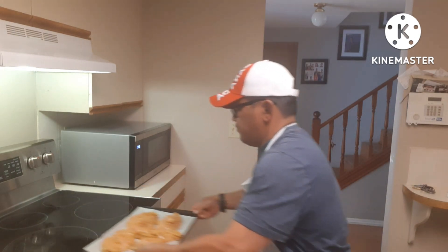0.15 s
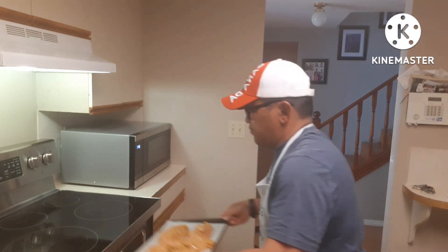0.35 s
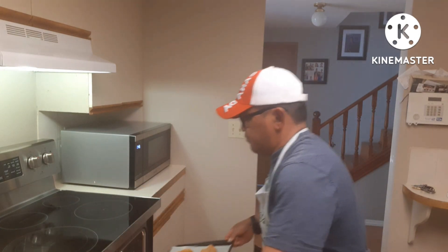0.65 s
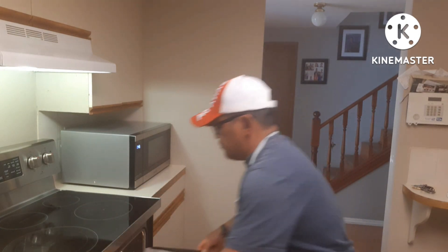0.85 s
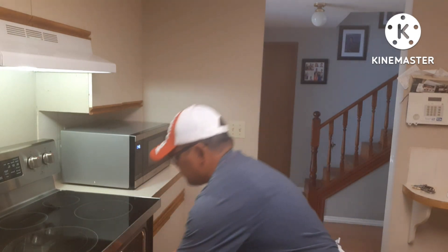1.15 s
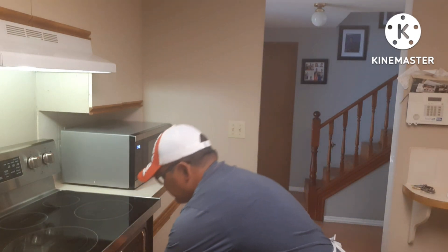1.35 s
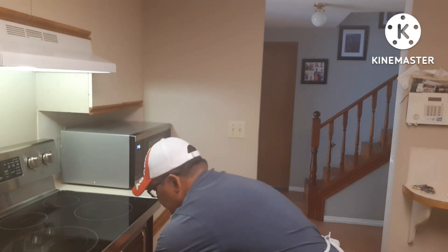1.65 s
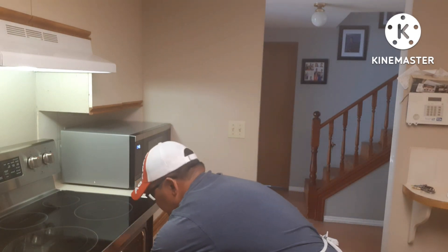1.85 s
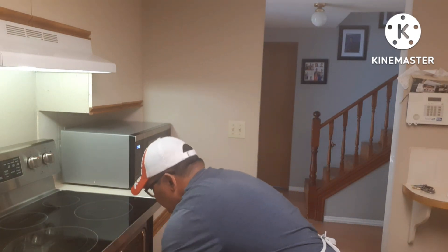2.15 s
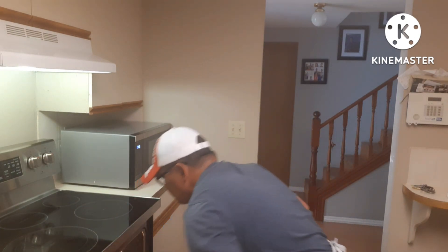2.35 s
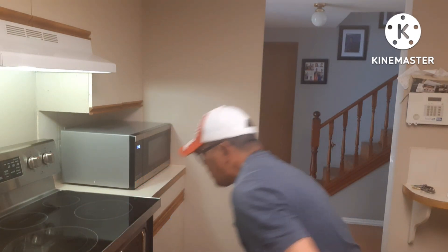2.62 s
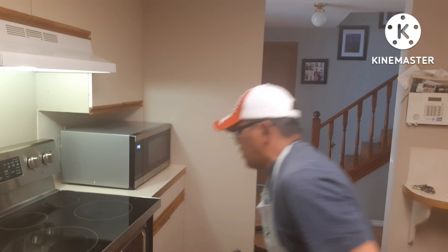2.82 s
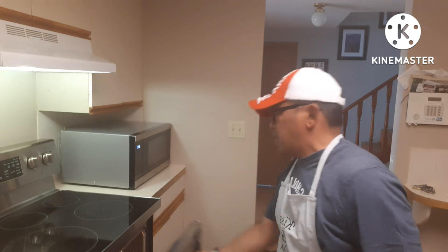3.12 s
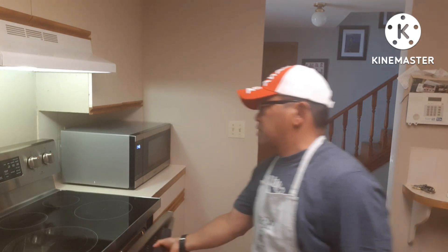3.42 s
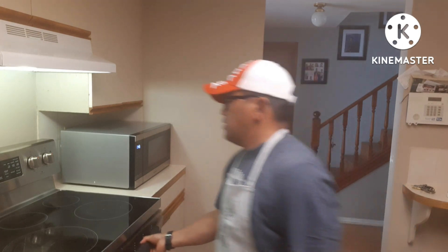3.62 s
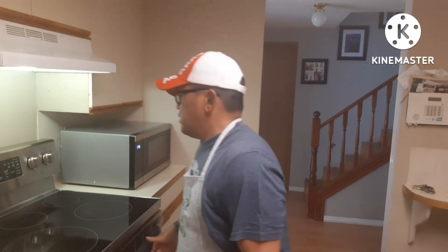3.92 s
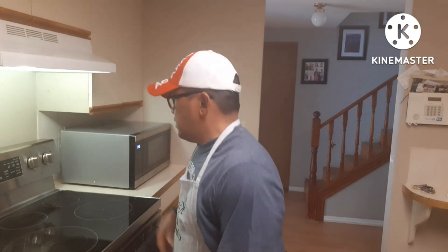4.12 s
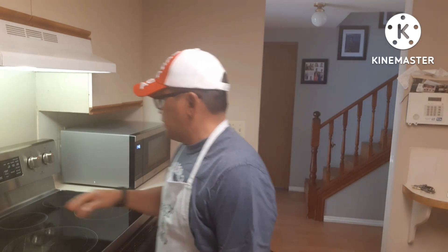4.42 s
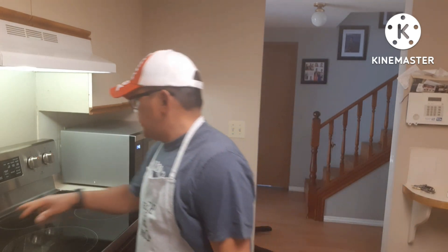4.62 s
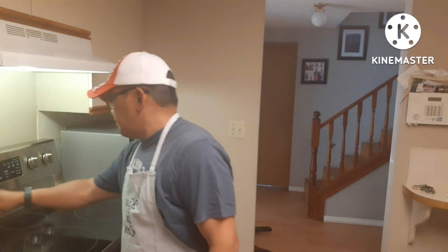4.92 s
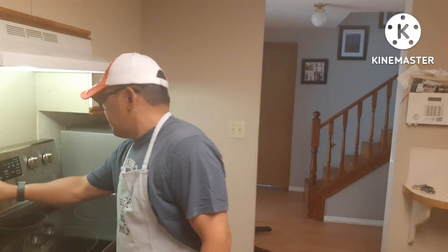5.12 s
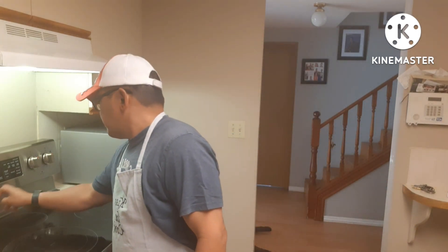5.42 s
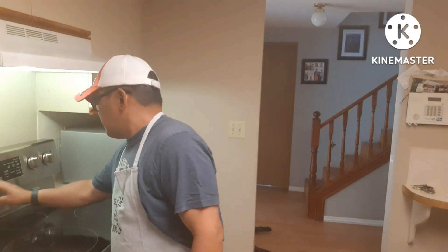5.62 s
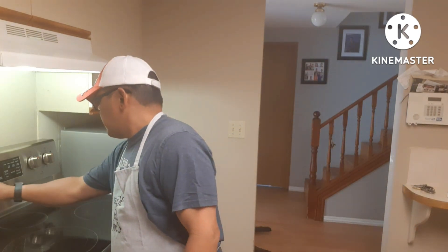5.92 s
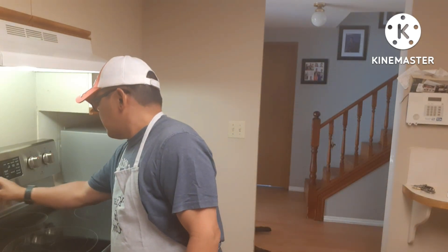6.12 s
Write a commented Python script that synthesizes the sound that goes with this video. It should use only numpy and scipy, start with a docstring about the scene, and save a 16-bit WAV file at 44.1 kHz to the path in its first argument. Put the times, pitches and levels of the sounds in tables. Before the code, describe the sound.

A small, hard kitchen is heard closely in stereo, with short bright room ring and very faint hiss and low rumble. From 0 to 0.3 seconds a thin metal sheet scrapes with growing force off a stove top, with quick clattering knocks. A hinge rubs from 0.5, and the oven door comes off its seal with a soft low boom near 0.75. A tiny wire tick comes at 1.1. The sheet lands on the rack with a rattling clank at 1.6 and a louder one at 2.0. The rack slides in quietly from 2.7 to 3.5, its pitch sinking. The door bumps at 3.25, springs creak and snap through 3.9, and it thuds shut at 4.06, with small after-rattles until 4.45. A low steady electrical hum sets in around 3.8. One hollow panel knock sounds at 4.95; fingers brush barely audibly near 5.8 before the end at about 6.3.

```python
"""Baking sheet into the oven

A metal sheet scrapes off a stove top, the oven door is pulled open and the sheet clanks onto the wire rack.
The rack slides in, the door creaks up on sprung hinges and shuts, and a hand knocks the control panel.
Blows and rubs are shaped noise through each part's resonances; the small hard kitchen rings after every blow.
Sine tones make the booms and a low mains hum that sets in; filtered noise makes rumble and hiss."""
import sys
import numpy as np
from scipy import signal
from scipy.fft import rfft, irfft, next_fast_len
from scipy.io import wavfile
from scipy.ndimage import map_coordinates

SR = 44100
rng = np.random.default_rng(int(sys.argv[2]) if len(sys.argv) > 2 else 0)


def store_pcm(level_fs):
    """Save levels as 16-bit WAV."""
    pcm = np.round(np.clip(level_fs, -1, 1) * 32767).astype(np.int16)
    wavfile.write(sys.argv[1], SR, np.atleast_2d(pcm).T)


N = 276138  # samples

# Contacts, before tone and trim: start_s, thud_db, clank_db, hardness_db_per_octave (treble), rattle_s
SHEET_BLOWS = [(0.095, -50.5, -37, -5, 0.06), (0.122, -50.5, -32.5, -6.5, 0.07),
               (0.232, -51, -34.5, 0.5, 0.026), (0.251, -46, -35, -2, 0.034), (1.613, -35, -40, 2, 0.17),
               (2.007, -45, -38.5, 0.5, 0.015), (2.011, -34, -30.5, -2.25, 0.084),
               (2.739, -57, -53.5, 2.5, 0.027)]
# Door bumps against the frame: start_s, thud_db, clank_db, hardness_db_per_octave, rattle_s
DOOR_BLOWS = [(3.254, -39, -41.5, -1.2, 0.018), (4.061, -35, -39, -1.7, 0.04),
              (4.234, -57.5, -63, 2, 0.067), (4.407, -50, -48.5, 0.24, 0.04)]
# Snaps of the hinge springs, and the latch catching at 4.101 s: start_s, thud_db, clank_db,
# hardness_db_per_octave, rattle_s
HINGE_SNAPS = [(0.765, -53, -58.5, 1.93, 0.0054), (3.214, -59.5, -48.5, 2.13, 0.017),
               (3.532, -49, -43.5, 0.2, 0.025), (3.687, -39.5, -42, 2.5, 0.025),
               (3.828, -48.5, -52.5, -1.5, 0.025), (4.101, -50, -49, -0.1, 0.029)]
# A knock on the panel: start_s, thud_db, clank_db, hardness_db_per_octave, rattle_s
PANEL_KNOCKS = [(4.945, -38.5, -48.5, 0.0059, 0.079)]
# A light tap on a rack wire: start_s, thud_db, clank_db, hardness_db_per_octave, rattle_s
WIRE_TAPS = [(1.104, -73, -61, 0, 0.015)]

# How each struck part shares out a blow: bass_db, body_db, middle_db, treble_db, top_db
SHEET_TONE = [-13, -1, 1, -2, -10.5]
# Door: bass_db, body_db, middle_db, treble_db, top_db
DOOR_TONE = [-6.5, 1.5, 0.5, -2.5, -15.5]
# Hinge: bass_db, body_db, middle_db, treble_db, top_db
HINGE_TONE = [-8, -2.5, -1, 5.5, -3]
# Panel: bass_db, body_db, middle_db, treble_db, top_db
PANEL_TONE = [-26.5, 1, 1.5, -1.5, -7.5]
# Wire: bass_db, body_db, middle_db, treble_db, top_db
WIRE_TONE = [-7.5, -1, 2.5, 17, 15.5]
# The five bands of those tones: low_hz, high_hz
TONE_BANDS = [(45, 170), (170, 600), (600, 2500), (2500, 8000), (8000, 16000)]

# Resonances over the broad response: centre_hz, width_hz, level_db
SHEET_MODES = [(197, 30, 4), (285, 60, 7), (357, 60, 10), (523, 28, 8), (724, 21, 8), (988, 45, 6),
               (1090, 42, 4), (1165, 20, 6.5), (1515, 70, 7), (2050, 70, 10), (2330, 240, 5),
               (2920, 90, 0.5), (3390, 120, 6.5), (4890, 160, 4)]
# Oven door: centre_hz, width_hz, level_db
DOOR_MODES = [(61.7, 27, 12), (92, 30, 11), (173, 30, 6), (287, 13, 15), (352.5, 23, 16), (931, 50, 2.7),
              (1300, 28, 1.2), (2010, 80, 4.3), (4210, 190, 3)]
# Sprung hinge: centre_hz, width_hz, level_db
HINGE_MODES = [(61.5, 30, 12.5), (95, 49, 10), (383, 83, -0.5), (1150, 80, 1.5), (1550, 72, 6.5),
               (2058, 100, 6.5), (2985, 190, -3), (4940, 250, 1), (5500, 420, 3.5), (6150, 250, 0.5),
               (7380, 970, 3)]
# Hollow control panel: centre_hz, width_hz, level_db
PANEL_MODES = [(272, 55, 22), (332, 90, 21.5), (398, 38, 21.5), (536, 92, 16), (735, 79, 16),
               (1475, 73, 17.5), (2150, 180, 9.5), (3670, 690, 11), (4790, 80, 9), (5510, 71, -5)]
# Rack on its rails: centre_hz, width_hz, level_db
RACK_MODES = [(140, 30, 19), (245, 50, 18), (930, 120, 18), (1120, 50, 13), (1580, 110, 17), (2040, 80, 16),
              (2880, 130, 15), (3710, 110, 8), (4100, 130, 9), (5900, 500, 6)]
# Thin rack wire: centre_hz, width_hz, level_db
WIRE_MODES = [(1210, 98, 13), (3040, 520, 8.5), (3620, 290, 11.5), (4530, 360, 15), (6550, 400, 10),
              (7400, 600, 7.5)]
# The oven's cavity, which colours the hiss: centre_hz, width_hz, level_db
CAVITY_MODES = [(1520, 80, 8.5), (2030, 81, 4.5)]

# Strokes, levels reached at the end and before trim: start_s, end_s, friction_db, shudder_db, swell_db_per_s
SHEET_DRAG = [(0, 0.23, -36.5, -42, 21.5), (0.255, 0.32, -34, -36, -17.5)]
# Rack on its rails: start_s, end_s, friction_db, shudder_db, swell_db_per_s
RACK_SLIDES = [(1.4, 1.6, -76, -86, 25), (1.76, 1.96, -62, -53.5, -40), (2.735, 2.99, -51.5, -49.5, -5),
               (3.06, 3.52, -63, -77.5, -1.5)]
# Hinge springs, and last the hand letting go of the door handle: start_s, end_s, friction_db, shudder_db,
# swell_db_per_s
HINGE_RUBS = [(0.52, 0.745, -53.5, -58.5, 78), (3.37, 3.51, -74, -51.5, -12), (3.835, 3.865, -43, -48, -7),
              (3.92, 4.03, -65.5, -54.5, -39.5), (4.13, 4.17, -58.5, -40, -64),
              (4.28, 4.38, -52.5, -53, 21.5), (4.43, 4.455, -57.5, -41, 2), (4.6, 4.88, -81, -79.5, -59)]
# Fingers on the panel: start_s, end_s, friction_db, shudder_db, swell_db_per_s
FINGER_RUBS = [(5.775, 5.81, -86.5, -95, -56)]
# Pitch of the rails' resonances falls with the travel, before drift: time_s, pitch_ratio
RACK_GLIDE = [(2.748, 1.04), (3.198, 0.95), (3.5, 0.9)]

# Friction colour of the sheet on the stove: frequency_hz, relative_db
SHEET_GRIT = [(290, -38.5), (500, -9.5), (800, -9.5), (1050, -8.5), (1490, -3), (2070, -7), (3000, -4.5),
              (7240, -11.5), (8720, -12.5), (11100, -15.5), (15500, -12.5)]
# Friction colour of the rails: frequency_hz, relative_db
RACK_GRIT = [(400, -15.5), (650, -1), (1300, -3.5), (3000, -7), (7000, -9), (15000, -13.5)]
# Friction colour of the hinges: frequency_hz, relative_db
HINGE_GRIT = [(400, -8), (700, -1.5), (1900, 2), (3000, 2.5), (5200, 1.5), (8000, -7), (15000, 0)]
# Friction colour of the fingers: frequency_hz, relative_db
FINGER_GRIT = [(500, -19.5), (1500, -12.5), (2400, -1), (3600, -14), (8000, -23), (15000, -9)]
# Shudder colour of the sheet: frequency_hz, relative_db
SHEET_SHUDDER = [(60, -18), (130, -6), (200, -2.5), (380, 4.5), (600, -1.5), (900, -25.5)]
# Shudder colour of the rack: frequency_hz, relative_db
RACK_SHUDDER = [(50, -7), (100, -15.5), (220, -6), (350, -2), (550, -7.5), (900, -19.5)]
# Shudder colour of the door, shared by the panel: frequency_hz, relative_db
DOOR_SHUDDER = [(25, -20), (45, -4.5), (100, -2.5), (200, -9), (400, -10), (900, -28)]

# The door booms as it is pulled off its seal: start_s, level_db
BOOMS = [(0.693, -38), (.752, -30), (0.817, -40.5), (0.985, -60)]
# Ringing tones of each boom: frequency_hz, relative_db, t60_s
BOOM_MODES = [(95, 6, 0.12), (71.3, -13.5, 0.23), (131.4, -6, .1), (195.7, -6, 0.13), (286, -28.5, 0.31)]

# Partials of the mains hum: frequency_hz, relative_db
MAINS_PARTIALS = [(120, 0), (240, -15), (360, -30)]
# Thin buzz, before waver: time_s, level_db
BUZZ_LEVEL = [(0, -90), (1.2, -81), (2.5, -81), (3.9, -69.5), (4.7, -78.5), (6.26, -79.5)]
HUM_FULL_S, HUM_RISE_S = 3.9, 0.2  # the swell ends at HUM_FULL_S
MAINS_DB, MAINS_SAG_DB_PER_S = -61.5, 1.0  # before waver
DRONE_DB, DRONE_GROWS_DB = -73, 3  # before waver; the motor works harder once the hum is on

# Colour of the room hiss: frequency_hz, relative_db
HISS_COLOUR = [(300, -19), (700, 5.5), (1000, 1), (1550, 0.5), (2200, 0.5), (3200, -1.5), (6200, -2.5),
               (9000, -5), (11500, -2.5), (14000, 4.5), (15500, 1.5)]
# Room hiss, a little stronger while the oven stands open: time_s, level_db
HISS_LEVEL = [(0, -80.5), (1.0, -70.5), (2.6, -72), (4.8, -74), (6.26, -78.5)]
# Colour of the appliance rumble: frequency_hz, relative_db
RUMBLE_COLOUR = [(20, -18), (45, -14.5), (80, 6.5), (115, -7), (200, -11), (330, -11), (500, -18),
                 (900, -25.5), (2000, -58)]
# Appliance rumble: time_s, level_db
RUMBLE_LEVEL = [(0, -76), (2.6, -72), (4.0, -69), (6.26, -70)]

# Kitchen decay, before the object's sustain: frequency_hz, t60_s
KITCHEN_DECAY = [(70, 0.33), (260, 0.42), (700, 0.4), (1900, 0.42), (5000, 0.41), (13000, .36)]
# Left-right likeness of diffuse sound: frequency_hz, correlation_ratio
LIKENESS = [(100, 0.94), (270, 0.83), (520, 0.68), (1000, 0.057), (10000, 0.018)]
DIRECT_GAIN = 0.11  # dry contact against the kitchen's answer
# Microphone port notch: frequency_hz, gain_db
PORT_NOTCH = [(7900, 0), (8500, -17), (9000, -11), (9700, -5), (11000, 0), (15000, -3)]
TOP_HZ = 15650  # nothing passes from here up


def amp(db):
    """Decibels to gain."""
    return 10 ** (np.asarray(db) / 20)


def rms(x):
    """Root mean square, never quite zero."""
    return np.sqrt(np.mean(x ** 2) + 1e-20)


def along(points, hz):
    """Read (frequency_hz, value) points on a log frequency axis."""
    point_hz, values = np.transpose(points)
    return np.interp(np.log(hz + 1), np.log(point_hz + 1), values)


def gains(rows):
    """One gain per sample from (time_s, level_db) points."""
    return amp(np.interp(np.arange(N) / SR, *np.transpose(rows)))


def wobble(rate):
    """A random curve of straight segments, rate knots a second."""
    knots = rng.standard_normal(int(N * rate / SR) + 4)
    return map_coordinates(knots, [np.arange(N) * rate / SR], order=1)


def coloured(x, gain):
    """Pass x through the causal minimum-phase filter whose magnitude is gain(hz)."""
    size = x.shape[-1]
    m = 2 * next_fast_len(size // 2 + SR // 8)
    magnitude = np.maximum(gain(np.fft.rfftfreq(m, 1 / SR)), 1e-6)
    cepstrum = irfft(np.log(magnitude), m)
    # folding the cepstrum forward in time makes the filter causal
    cepstrum[1:m // 2] *= 2
    cepstrum[m // 2 + 1:] = 0
    return irfft(rfft(x, m) * np.exp(rfft(cepstrum)), m)[..., :size]


def resonant(modes, hz):
    """Gain of an object: its resonances stand on a broad response."""
    power = 1
    for centre, width, db in modes:
        power = power + amp(db) ** 2 / (1 + (2 * (hz - centre) / width) ** 2)
    return np.sqrt(power)


def minor_modes(hz, count=600):
    """Sheet metal has countless small modes; every blow wakes a different mix of them."""
    depth_db = 2.8
    knots_hz = np.linspace(0, SR / 2, count)
    return amp(depth_db * np.interp(hz, knots_hz, rng.standard_normal(count)))


def diffuse(size):
    """Noise at two close microphones: alike in the bass, unrelated in the treble."""
    m = next_fast_len(size)
    likeness = along(LIKENESS, np.fft.rfftfreq(m, 1 / SR))
    turn = np.arccos(np.clip(likeness, -1, 1)) / 2
    noise = rfft(rng.standard_normal((2, m)))
    mid, side = irfft(noise * [np.cos(turn), np.sin(turn)], m)[:, :size]
    return np.array([mid + side, mid - side])


def kitchen(sustain, late_db=-29, late_t60=0.66):
    """The walls' dense answer, stretched by the object's sustain, and a faint longer tail from the hall."""
    hz, t, z = signal.stft(diffuse(SR), SR, nperseg=256)
    walls = amp(-60 * t / (sustain * along(KITCHEN_DECAY, hz)[:, None]))
    hall = amp(late_db - 60 * t / (sustain * late_t60))
    tail = signal.istft(z * (walls + hall), SR, nperseg=256)[1][:, :SR]
    return tail / np.linalg.norm(tail[0])


def band_level_db(x, band):
    """Level of x within one frequency band."""
    sos = signal.butter(2, band, "band", fs=SR, output="sos")
    return 20 * np.log10(rms(signal.sosfilt(sos, x)))


def blows(rows, modes, tone, chatter, rise_s, trim_db, sustain, store_s=0.022):
    """Contacts chatter and ring object and room; weight sets the thud, hardness the treble."""
    out, t = np.zeros((2, N + SR)), np.arange(SR) / SR
    centres = np.sqrt(np.prod(TONE_BANDS, axis=1))
    octaves = np.log2(centres / centres[2])
    for s, thud_db, clank_db, hardness, rattle_s in rows:
        # one sharp hit, then a burst of spiky noise
        force = rng.standard_normal(SR) ** 3
        force *= amp(-60 * t / max(rattle_s, 0.002)) * (1 - np.exp(-t / rise_s))
        force *= chatter / np.linalg.norm(force)
        force[0] += 1
        force /= np.linalg.norm(force)
        # the room fills while the contact chatters; late touches keep it ringing longer
        stored = force ** 2 * np.exp(np.minimum(t, rattle_s) / store_s)
        room = np.sqrt(np.cumsum(stored)) * kitchen(sustain)
        ring = coloured(DIRECT_GAIN * force + room, lambda hz: resonant(modes, hz) * minor_modes(hz))
        # bring the first 50 ms to the wanted level in each band
        attack = ring.mean(axis=0)[:SR // 20]
        own_db = [band_level_db(attack, band) for band in TONE_BANDS]
        band_db = np.where(octaves < 0, thud_db, clank_db + hardness * octaves) + tone
        balance = np.column_stack([centres, band_db - own_db])
        # thin sheet metal radiates little of the deepest bass
        thin = [(25, -8.5), (55, -0.5)]
        voiced = coloured(ring, lambda hz: amp(along(balance, hz) + along(thin, hz)))
        out[:, round(s * SR):][:, :SR] += voiced
    return amp(trim_db) * out[:, :N]


def stroke_gains(strokes, attack_s, release_s, tail_db=-30, tail_s=0.41):
    """Friction and shudder gains: each stroke rises, swells or sags, then dies away in the room."""
    t, power = np.arange(N) / SR, np.zeros((2, N))
    for start, end, friction_db, shudder_db, swell in strokes:
        before, after = np.maximum(start - t, 0), np.maximum(t - end, 0)
        hold = amp(swell * (np.clip(t, start, end) - end) - 60 * before / attack_s)
        release = amp(-60 * after / release_s) + amp(tail_db - 60 * after / tail_s)
        power += (amp([[friction_db], [shudder_db]]) * hold * release) ** 2
    return np.sqrt(power)


def rubbing(strokes, modes, grit, shudder, rough_db, grit_trim_db, shudder_trim_db, attack_s, release_s,
            glide=1, drift=0.012):
    """Surfaces slide: uneven slips excite the resonances while the part shudders in its mounts."""
    friction, shake = stroke_gains(strokes, attack_s, release_s)
    slips = amp(rough_db * wobble(140))
    # the resonances wander as the point of contact travels
    clock = np.cumsum(glide + drift * wobble(6))

    def excited(spectrum):
        """Slipping noise through the resonances, bent in pitch by the clock."""
        x = coloured(diffuse(N) * slips, lambda hz: amp(along(spectrum, hz)) * resonant(modes, hz))
        bent = np.array([map_coordinates(side, [clock], mode="mirror") for side in x])
        return bent / rms(x)

    scrape = amp(grit_trim_db) * friction * excited(grit)
    return scrape + amp(shudder_trim_db) * shake * excited(shudder)


def background():
    """Low appliance rumble under a faint hiss, both filtered diffuse noise."""
    hiss = coloured(diffuse(N), lambda hz: amp(along(HISS_COLOUR, hz)) * resonant(CAVITY_MODES, hz))
    rumble = coloured(diffuse(N), lambda hz: amp(along(RUMBLE_COLOUR, hz)))
    return gains(HISS_LEVEL) * hiss / rms(hiss) + gains(RUMBLE_LEVEL) * rumble / rms(rumble)


def hum(buzz_hz=600, drone_hz=37, waver_db=2.5):
    """Mains hum swells in and sags slowly, over a thin buzz and a slow motor's drone."""
    t = np.arange(N) / SR
    on = np.clip(1 + (t - HUM_FULL_S) / HUM_RISE_S, 0, 1)

    def waver():
        """A slow random change of level."""
        return amp(waver_db * wobble(1.7))

    def tone(hz):
        """A sine of unit RMS with a random phase."""
        return np.sqrt(2) * np.sin(2 * np.pi * (hz * t + rng.random()))

    mains = sum(amp(db) * tone(hz) for hz, db in MAINS_PARTIALS)
    mains = on * amp(MAINS_DB - MAINS_SAG_DB_PER_S * (t - HUM_FULL_S)) * mains
    buzz = gains(BUZZ_LEVEL) * tone(buzz_hz)
    motor = tone(drone_hz) + amp(-12.5) * tone(2 * drone_hz)
    motor = amp(DRONE_DB + DRONE_GROWS_DB * on) * motor
    return mains * waver() + buzz * waver() + motor * waver()


def baking_sheet():
    """The sheet is dragged over the stove's edge, then set on the rack, which runs out and in on its rails."""
    drag = rubbing(SHEET_DRAG, SHEET_MODES, SHEET_GRIT, SHEET_SHUDDER, rough_db=1.0,
                   grit_trim_db=2, shudder_trim_db=-4.5, attack_s=0.1, release_s=0.21)
    glide = np.interp(np.arange(N) / SR, *np.transpose(RACK_GLIDE))
    rails = rubbing(RACK_SLIDES, RACK_MODES, RACK_GRIT, RACK_SHUDDER, rough_db=1.5,
                    grit_trim_db=2.0, shudder_trim_db=-3, attack_s=0.18, release_s=0.45, glide=glide)
    clanks = blows(SHEET_BLOWS, SHEET_MODES, SHEET_TONE, chatter=2.0, rise_s=0.0049,
                   trim_db=-3.0, sustain=1.07)
    return drag + rails + clanks


def oven_door():
    """Hinge springs rub and snap as the door swings, the latch catches and the hand lets go of the handle; the
    door booms and bumps against the frame."""
    springs = rubbing(HINGE_RUBS, HINGE_MODES, HINGE_GRIT, DOOR_SHUDDER, rough_db=1.0,
                      grit_trim_db=-1.0, shudder_trim_db=-5, attack_s=0.12, release_s=0.49)
    snaps = blows(HINGE_SNAPS, HINGE_MODES, HINGE_TONE, chatter=0.7, rise_s=0.004,
                  trim_db=-3.5, sustain=1.0)
    bumps = blows(DOOR_BLOWS, DOOR_MODES, DOOR_TONE, chatter=0.93, rise_s=0.023,
                  trim_db=-2.5, sustain=0.92)
    return door_boom() + springs + snaps + bumps


def door_boom(attack_s=0.0099):
    """The wide door panel flexes with a soft low ring of decaying sines."""
    out, t = np.zeros(N + SR), np.arange(SR) / SR
    ring = sum(amp(db - 60 * t / t60) * np.sin(2 * np.pi * hz * t) for hz, db, t60 in BOOM_MODES)
    for s, db in BOOMS:
        out[round(s * SR):][:SR] += amp(db) * ring * (1 - np.exp(-t / attack_s))
    return out[:N]


def wire_tap():
    """A thin rack wire is touched and pings brightly."""
    return blows(WIRE_TAPS, WIRE_MODES, WIRE_TONE, chatter=1.3, rise_s=0.005, trim_db=-3.5, sustain=1.18)


def control_panel():
    """A hand knocks the hollow panel, then fingers brush over it."""
    brush = rubbing(FINGER_RUBS, PANEL_MODES, FINGER_GRIT, DOOR_SHUDDER, rough_db=2.0,
                    grit_trim_db=12.5, shudder_trim_db=6, attack_s=0.13, release_s=0.45)
    knock = blows(PANEL_KNOCKS, PANEL_MODES, PANEL_TONE, chatter=2.3, rise_s=0.011,
                  trim_db=-2.5, sustain=0.9)
    return brush + knock


def scene(right_db=0.98):
    """All sources together, a little louder on the right."""
    mix = background() + hum() + baking_sheet() + oven_door() + wire_tap() + control_panel()
    return mix * amp([[-right_db], [right_db]])


def record(dry):
    """The microphone cuts the deepest bass, has a notch in the treble and a band limit."""
    bass_cut = [(15, -27.5), (35, -0.5)]  # frequency_hz, gain_db
    heard = coloured(dry, lambda hz: amp(along(PORT_NOTCH, hz) + along(bass_cut, hz)))
    m = next_fast_len(N + SR // 4)
    passed = np.fft.rfftfreq(m, 1 / SR) < TOP_HZ
    return irfft(rfft(heard, m) * passed, m)[:, :N]


dry = scene()
out = record(dry)
store_pcm(out)
```